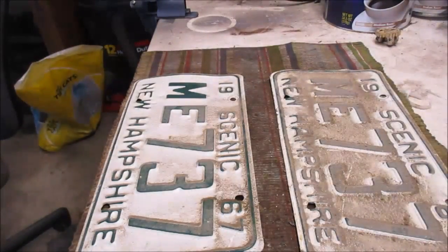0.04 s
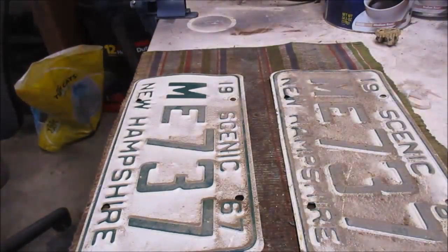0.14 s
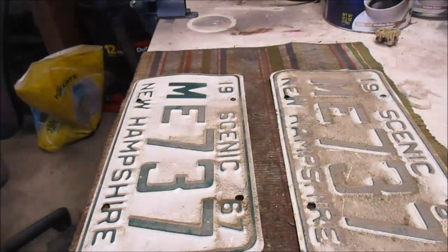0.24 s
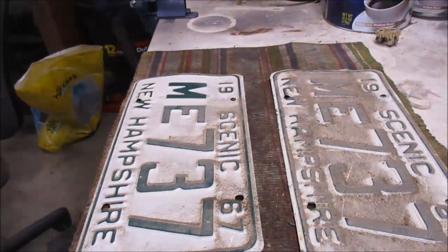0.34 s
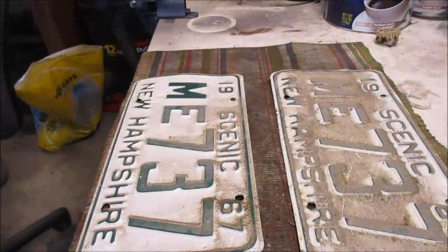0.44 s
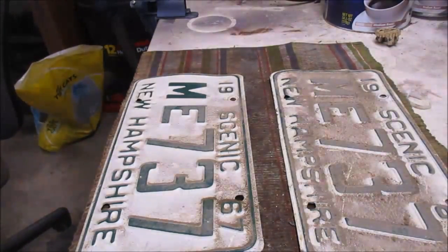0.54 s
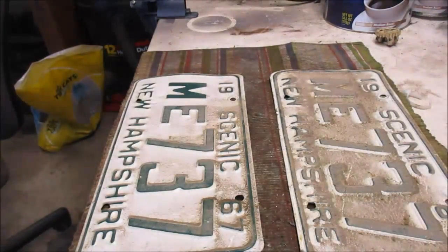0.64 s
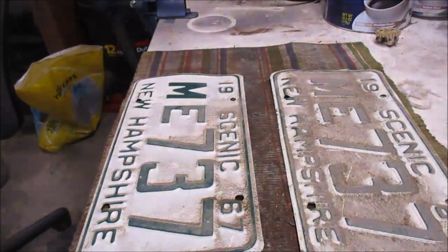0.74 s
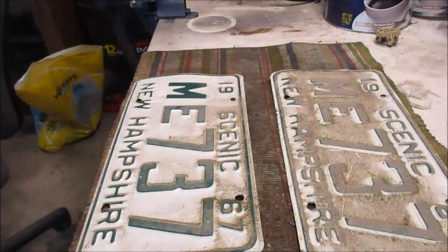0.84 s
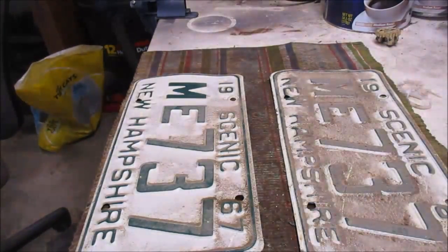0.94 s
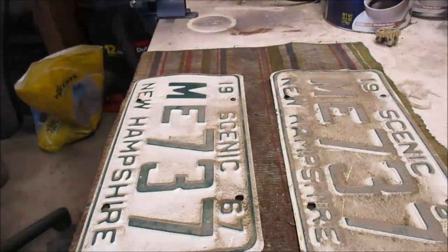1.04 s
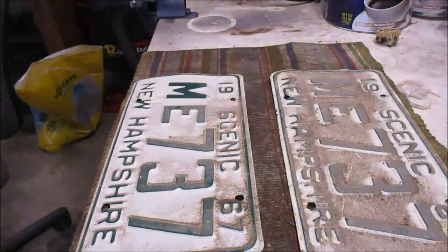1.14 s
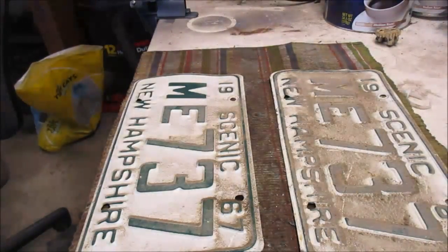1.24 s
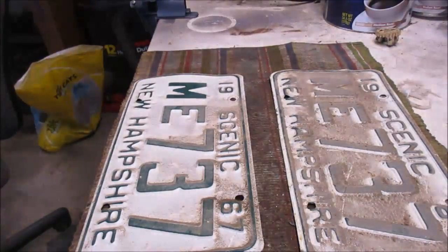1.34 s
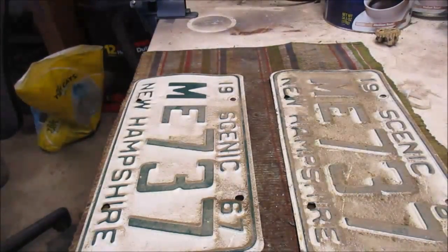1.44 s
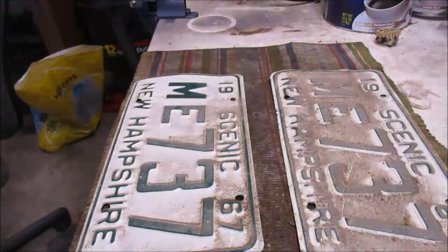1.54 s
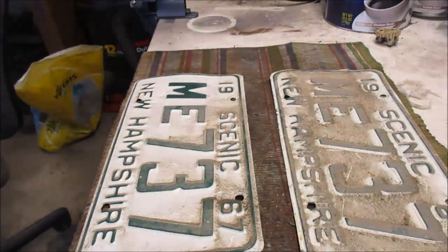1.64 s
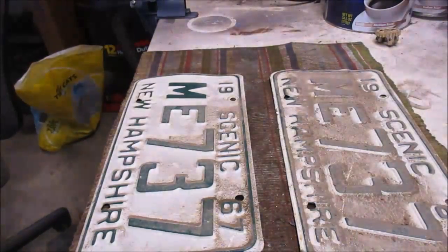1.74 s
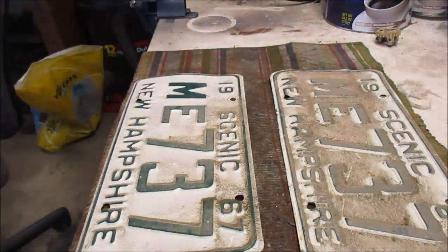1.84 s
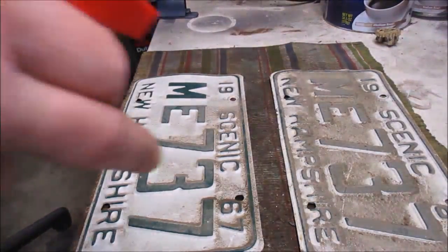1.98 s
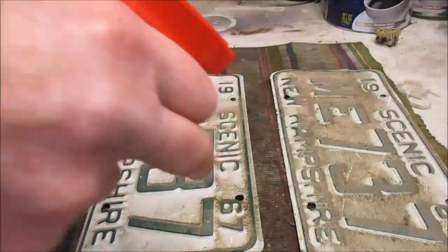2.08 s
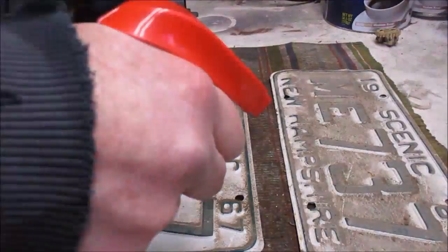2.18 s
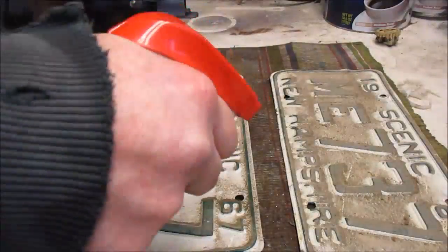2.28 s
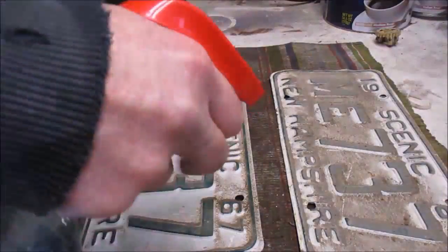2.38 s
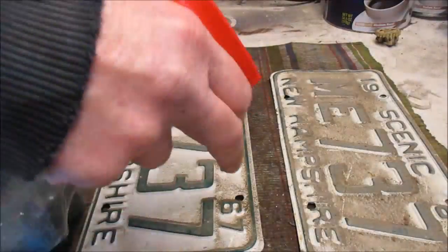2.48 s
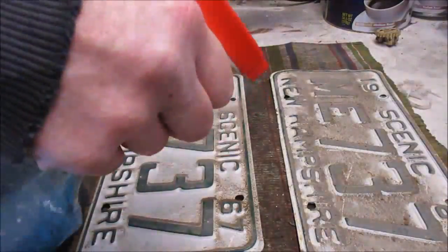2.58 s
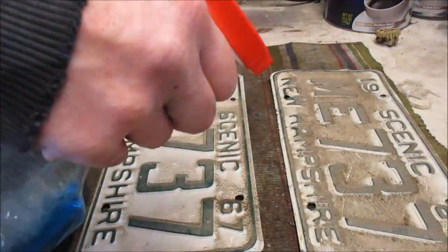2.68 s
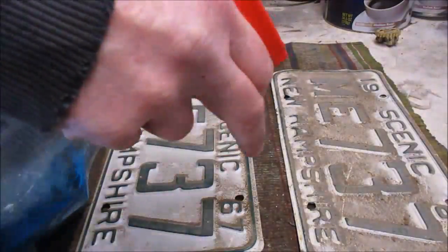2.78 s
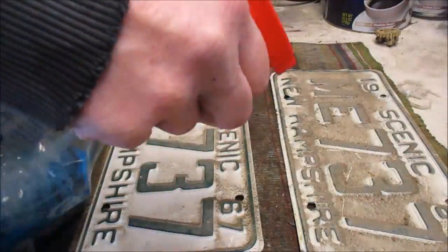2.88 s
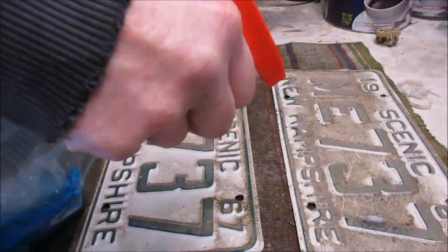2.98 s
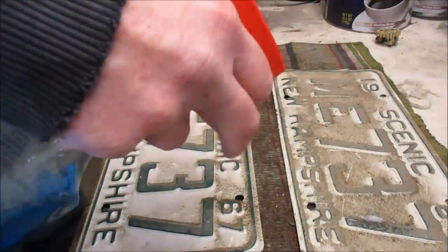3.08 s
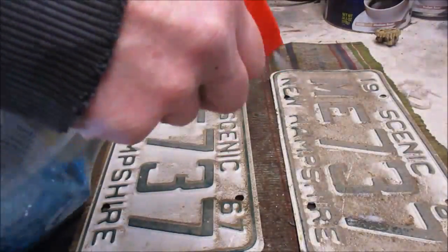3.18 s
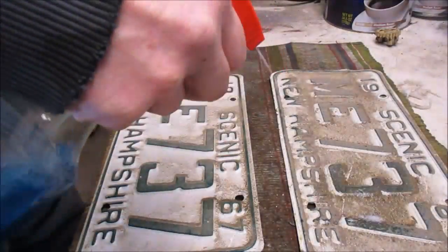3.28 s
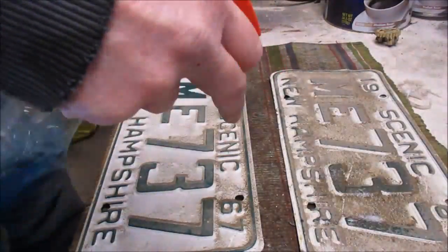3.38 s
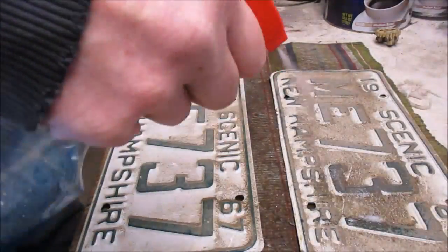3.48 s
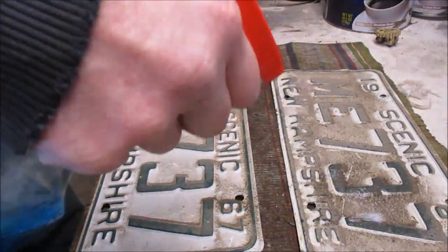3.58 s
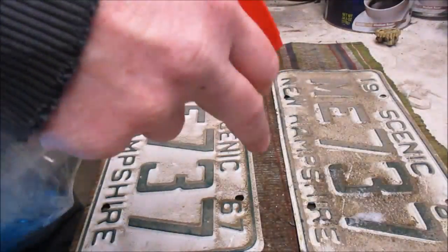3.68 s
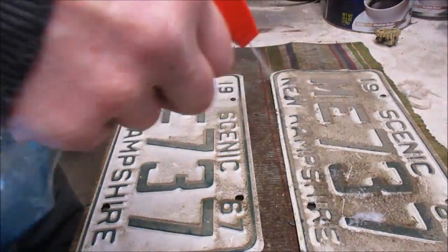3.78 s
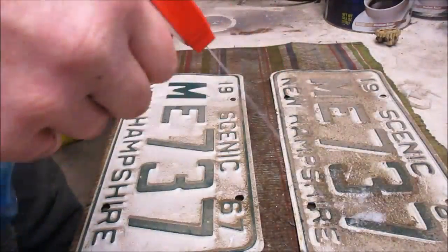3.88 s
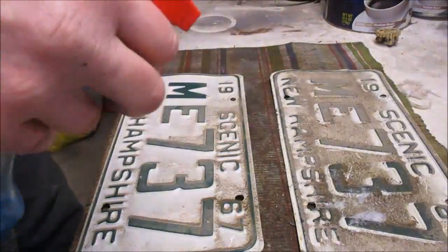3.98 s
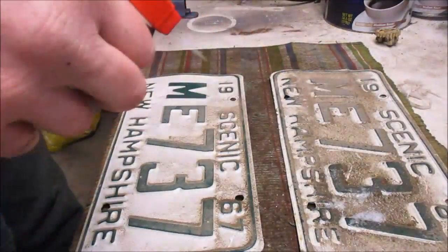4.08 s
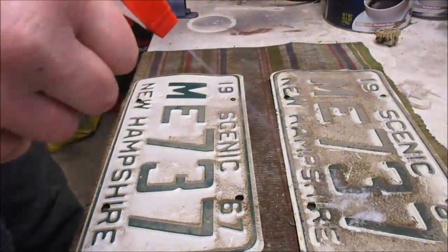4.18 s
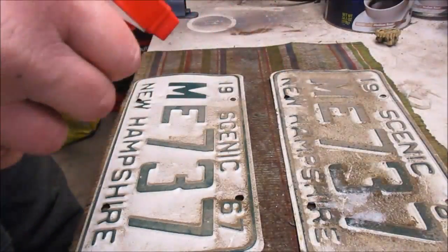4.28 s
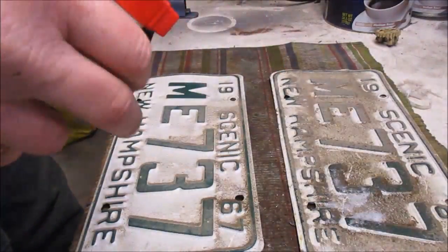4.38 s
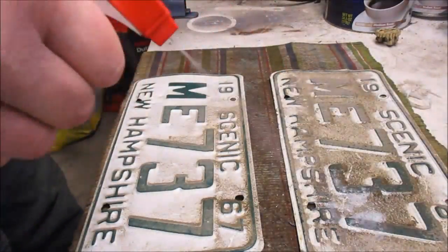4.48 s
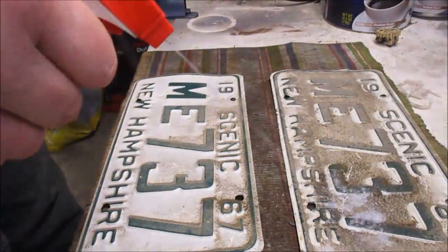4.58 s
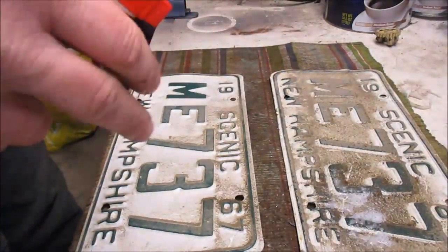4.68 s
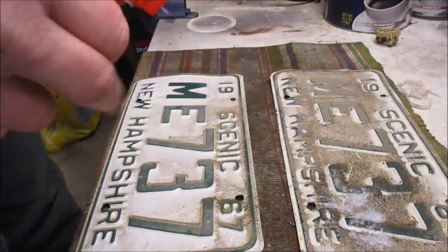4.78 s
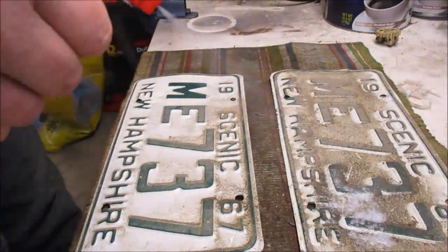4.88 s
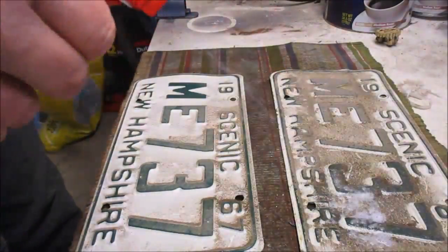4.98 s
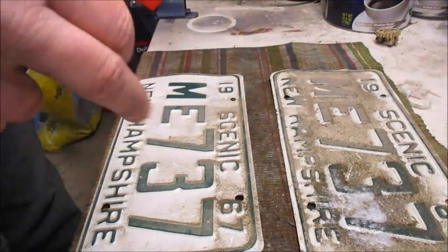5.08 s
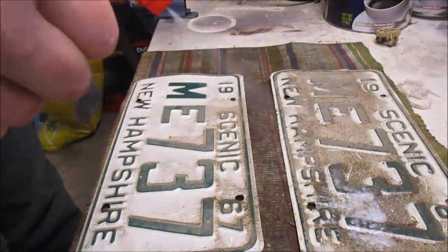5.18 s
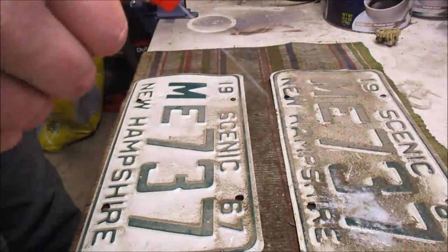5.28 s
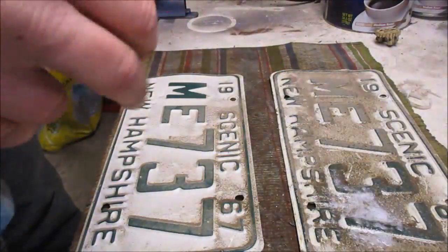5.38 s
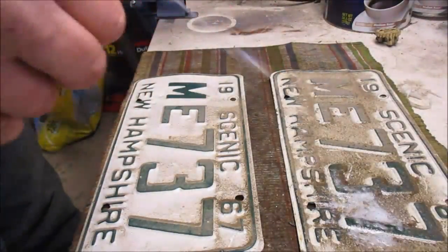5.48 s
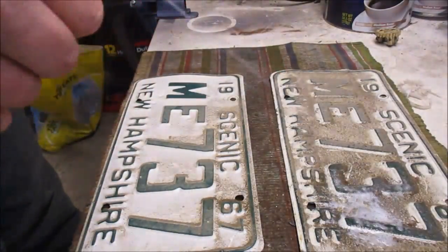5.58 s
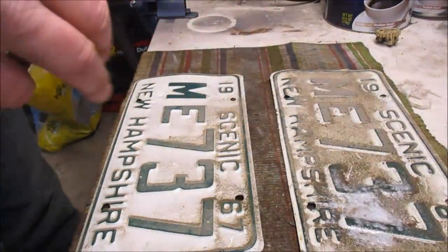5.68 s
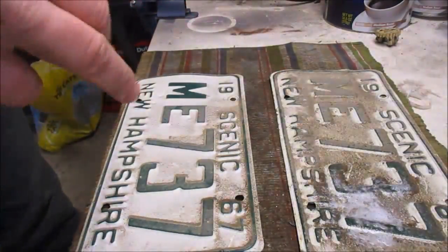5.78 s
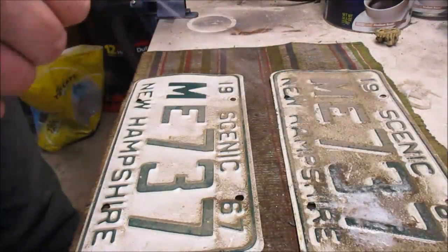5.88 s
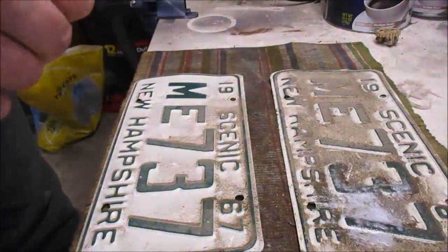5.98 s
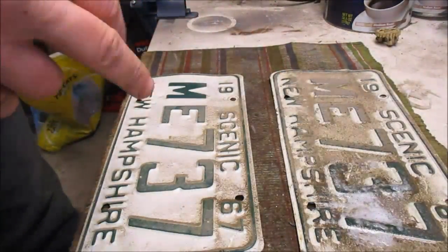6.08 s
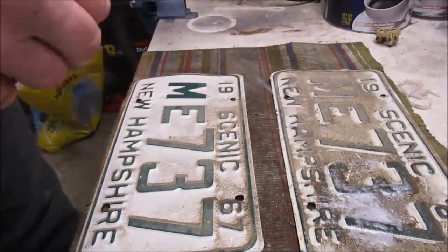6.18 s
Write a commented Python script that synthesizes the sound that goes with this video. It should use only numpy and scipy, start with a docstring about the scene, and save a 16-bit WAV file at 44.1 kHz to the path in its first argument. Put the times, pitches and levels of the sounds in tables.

```python
"""A plastic trigger bottle sprays cleaner on metal plates on a workbench, close by in a small workshop.
The spray is noise from the nozzle and random droplet impacts, reflected by the plate and bench.
The bottle is picked up with bumps and a rustling sleeve, and the pump primes with a few loud snaps; then come
about three spritzes a second. Between them the trigger clicks and creaks as filtered stick-slip impacts,
and the piston knocks the damped modes of the hollow bottle. Liquid stirs and a fan hums faintly."""
import sys
import numpy as np
from scipy import signal
from scipy.fft import rfft, irfft
from scipy.io import wavfile

SR = 44100
rng = np.random.default_rng(int(sys.argv[2]) if len(sys.argv) > 2 else 0)


def to_wav(sig):
    """Store sig (one row per channel, or 1-D mono) as 16-bit WAV at the path in sys.argv[1].

    Samples outside -1..1 are clipped; the rate is SR.
    """
    pcm = np.clip(np.atleast_2d(sig), -1, 1) * 32767
    pcm = np.round(pcm).astype(np.int16)
    wavfile.write(sys.argv[1], SR, pcm.T)  # frames by channels


N = 275013
TIME = np.arange(N) / SR
AFTER = TIME[:SR // 3]   # time since a blow [s]

# air noise of the room: level curve (time [s], level [dB]); spectrum (frequency [Hz], relative level [dB])
ROOM_LEVEL = [(0, -50.5), (2.5, -51.5), (2.65, -59.5), (2.8, -53.5), (3.03, -63), (3.3, -55.5), (4.7, -56),
              (5.1, -59), (6.24, -51)]
ROOM_SPECTRUM = [(12, -46), (20, -6), (74, 1), (146, -8), (198, -1.5), (270, -3.5), (301, -2.5),
                 (446, -3.5), (897, -4), (1000, -5.5), (1260, -11.5), (1400, -11), (1860, -16),
                 (16000, -44.5)]
# fan hum: (frequency [Hz], mean amplitude over the rms of the air noise [dB])
FAN_HUM = [(304, -9), (608, -8.5), (913, -9.5)]
# low rumble of the moving arm: (time [s], level [dB])
RUMBLE_LEVEL = [(2.0, -64), (2.2, -48), (2.47, -55.5), (2.65, -81), (3.4, -65), (5.3, -60)]
# liquid stirs in the bottle: (time [s], level [dB])
SLOSH_LEVEL = [(2.1, -61.5), (2.2, -51), (2.65, -60.5), (5.15, -57), (6.05, -47.5), (6.24, -57)]
# a sleeve brushes along as the arm reaches out:
# (time of maximum [s], relative level [dB], rise time [s], fall time [s])
SLEEVE_BRUSHES = [(0.01, -55.5, .05, 0.18), (.46, -50.5, .4, 0.31), (.89, -55, 0.074, 1),
                  (1.6, -50.5, 0.24, 0.25), (1.82, -59.5, 0.018, 0.31)]
BRUSH_DEPTH_DB = 25   # how far a brush rises and falls in those times
# rustle of the cloth: (frequency [Hz], relative level [dB])
CLOTH_SPECTRUM = [(710, -56), (1200, 3), (1370, -5.5), (2980, -10.5), (9410, -19), (14200, -29.5),
                  (16000, -42)]
# bumps as the bottle is fetched and handled:
# (time [s], peak level [dB], pitch [Hz], bandwidth [Hz], rattle t60 [s])
HANDLING_BUMPS = [(.281, -40.5, 170, 220, .15), (0.437, -33.5, 1260, 1100, .028),
                  (.44, -33, 1500, 1600, 0.37), (.869, -35, 168, 220, .033),
                  (1.457, -41.5, 5000, 1800, .03), (1.574, -27, 558, 89, 0.049),
                  (1.649, -36.5, 1400, 1200, 0.031), (1.809, -36, 1270, 1590, 0.063),
                  (2.1395, -16.5, 387, 259, 0.023), (2.212, -30.5, 447, 250, .21),
                  (2.222, -27.5, 770, 400, 0.2), (2.259, -36, 100, 90, 0.096),
                  (3.485, -36, 114.7, 74, 0.12)]

# the finger squeezes, the piston knocks and the jet follows:
# (time [s], relative knock level [dB], knock pitch [Hz], relative wall ring [dB], jet delay [s],
#  time to full pressure [s], time until release [s], mist level [dB], swell to full pressure [dB])
SQUEEZE_STROKES = [(2.139, -24, 240, -9, 0.042, .02, 0.024, -45, 5),
                   (2.545, -33, 340, -19, 0.032, .02, 0.025, -58.5, 2),
                   (2.87, -34, 330, -16, .026, 0.03, 0.1, -45, 9),
                   (3.158, -36.5, 333, -1, .037, 0.069, 0.13, -42, 2.5),
                   (3.478, -26.5, 300, -14, 0.024, .062, 0.12, -37, 20.5),
                   (3.792, -24, 323, -7, 0.028, 0.069, 0.12, -34, 15.5),
                   (4.115, -23.5, 321, -10, 0.032, 0.06, .11, -33, 6),
                   (4.464, -21, 300, -12, 0.029, 0.042, 0.12, -30.5, 11),
                   (4.815, -24.5, 328, -6.5, 0.027, 0.059, 0.16, -36, 2.5),
                   (5.161, -22.5, 324, -7, .04, 0.064, .1, -30, 21.5),
                   (5.496, -21, 315, -13, 0.035, 0.087, 0.12, -31.5, 7),
                   (5.845, -19, 321, -4.5, 0.029, 0.061, 0.12, -30.5, 1.5),
                   (6.188, -25.5, 293, -24, 0.018, 0.017, 0.07, -37.5, -1)]
# the valve shuts, then the trigger is let go and creaks back until the piston is home:
# (time let go [s], relative tick level [dB], creak over tick [dB], valve lead [s], relative valve knock [dB],
#  time home [s], relative home knock [dB], knock pitch [Hz], relative wall ring [dB], relative home tick [dB])
RETURN_STROKES = [(2.421, -31, -1, .033, -35, 2.493, -18, 381.6, -2, -38),
                  (2.7701, -38.5, -3, 0.032, -40, 2.82, -20.5, 300, -20, -27),
                  (3.0839, -33.5, -3, .034, -42, 3.117, -25.5, 360, 2, -39),
                  (3.3818, -27, -6.5, 0.02, -36.5, 3.399, -25.5, 294, 0.5, -42),
                  (3.688, -25.5, -5.5, .024, -35, 3.709, -24.5, 316, -1.5, -33),
                  (4.0218, -29, 0, 0.036, -38.5, 4.05, -24.5, 327, -0.5, -42),
                  (4.361, -23.5, -8.5, .036, -43, 4.398, -23, 340, -4, -26.5),
                  (4.702, -25.5, -2.5, 0.036, -42.5, 4.748, -19, 329, 1.5, -30),
                  (5.0476, -22.5, -7.5, .029, -38, 5.068, -25, 328, -3, -45),
                  (5.4033, -21, -8, .038, -42, 5.441, -21.5, 334, -5, -41),
                  (5.7351, -20, -9, 0.039, -36, 5.774, -16, 330, -4, -22.5),
                  (6.0875, -31, -1, .033, -26.5, 6.13, -16, 334, -4, -32)]
SLACK_S, SLACK_DB, SLACK_WALL_DB = 0.015, -15.5, -0.5   # a light touch takes up the slack before a squeeze
VALVE_HZ, VALVE_WALL_DB = 300, -17   # the valve's knock is low and soft
FREE_DB, FREE_WALL_DB = -12, -5   # coming free jolts the bottle: level against the tick, wall ring
# modes of the air and liquid in the bottle: (pitch ratio, relative level [dB], nominal t60 [s])
CAVITY_MODES = [(.71, -5, 0.029), (1.04, -1, 0.045), (1.4, -10, .03), (1.87, -21, 0.091)]
# modes of the bottle wall: (frequency [Hz], relative level [dB], nominal t60 [s])
WALL_MODES = [(1041, -3, 0.027), (1200, -2.5, 0.038), (1482, -8.5, 0.029), (2160, -9, 0.022),
              (3000, -15.5, 0.025)]

SQUEEZE_TICK_S, SQUEEZE_TICK_DB = .002, -15.5   # the trigger's tick: delay and level against the knock
STOP_CREAK_DB = -11.5   # creak after a tick at either stop
# air spits from the nozzle while the pump primes: (time [s], relative level [dB])
AIR_SPITS = [(2.882, -31.5), (2.8968, -29), (2.9182, -30)]
SPIT_FIZZ_DB = -16
# resonances of the trigger: (frequency [Hz], bandwidth [Hz], relative level [dB])
TRIGGER_RESONANCES = [(1160, 490, -2), (2260, 740, -4), (3150, 1030, -6.5), (5000, 930, -6.5),
                      (7340, 1140, -4), (8600, 390, -0.5), (9630, 780, -7.5), (12500, 3600, -18)]

# hiss and droplets of the spray: (frequency [Hz], relative level [dB])
MIST_SPECTRUM = [(290, -48), (500, -32), (631, -2), (773, -21), (1180, -2.5), (1640, -7), (2430, -7.5),
                 (3700, -4), (4150, -2), (4660, -3), (6420, -0.5), (8830, 1.5), (10200, -5), (13400, -1.5),
                 (16000, -8)]
# the jet opens, sags past full pressure, then dies
JET_ATTACK_S, JET_SAG_DB_PER_S, JET_RELEASE_DB_PER_S = .012, 133, 303

# the piston snaps against its stop:
# (time [s], relative level [dB], crack pitch [Hz], relative spring ring [dB], relative clack [dB])
STOP_SNAPS = [(2.4960, -14.5, 1700, 5, 10), (2.4969, -18, 6000, 3, 9), (2.82, -25, 4530, -14, 8.5),
              (2.8222, -12, 5000, -4, 2.5), (3.1156, -22.5, 3400, -8, 0), (3.1221, -22.5, 1600, -13, -3.5),
              (4.7486, -12, 3000, -37, -12), (6.1291, -16, 3000, -14, -19), (6.1404, -11, 3600, -25, -30)]
# resonances of the spray head: (frequency [Hz], bandwidth [Hz], relative level [dB])
HEAD_RESONANCES = [(1200, 330, 3.5), (2150, 860, -0.5), (2890, 1100, -1), (4270, 320, -2.5),
                   (5670, 990, -4.5), (8750, 1300, -2.5), (11600, 2700, -9)]
# modes of the return spring: (frequency [Hz], relative level [dB], nominal t60 [s])
SPRING_MODES = [(3990, -34, 0.02), (5080, 11, 0.013), (5560, -7, 0.04), (5800, 6.5, 0.014),
                (6000, -1.5, 0.058), (6300, 14.5, 0.012), (7000, -13, 0.047), (10980, -0.5, 0.019)]
# modes of the neck and cap: (frequency [Hz], relative level [dB], nominal t60 [s])
NECK_MODES = [(484, 0, 0.024), (604, -3, 0.031), (1200, -0.5, 0.019), (1440, 1.5, 0.0075),
              (1890, -1.5, 0.0067)]

# reflections from bench and walls, before they are dulled: (delay [s], level [dB])
NEAR_ECHOES = [(.0031, -26.5), (.0087, -27), (0.0142, -21.5)]
CUTOFF_HZ = 15900


def from_db(db):
    """Level to amplitude ratio: 20 dB is a factor of ten."""
    return 10 ** (np.asarray(db) / 20)


def rms_one(x):
    """Normalise the mean power to one."""
    return x / np.sqrt(np.mean(x ** 2) + 1e-20)


def level(rows):
    """Interpolate a level curve in dB and give the gain at every sample."""
    s, db = np.transpose(rows)
    return from_db(np.interp(TIME, s, db))


def add(out, s, sound):
    """Superpose a sound at a given time."""
    at = round(s * SR)
    out[at:at + len(sound)] += sound[:N - at]


def dying(t60):
    """Exponential decay: the amplitude falls by 60 dB in t60 seconds."""
    return np.exp(-np.log(1000) * AFTER / t60)


def drift(rate):
    """Slow random fluctuation of rms 1, with this many random points a second."""
    knots = rng.standard_normal(N // 20)
    return rms_one(np.interp(TIME * rate, np.arange(len(knots)), knots))


def coloured(x, spectrum):
    """Spectral shaping: weight the frequencies of a steady noise; rms 1."""
    hz, db = np.transpose(spectrum)
    bins = np.maximum(np.fft.rfftfreq(N, 1 / SR), 1)
    gain = from_db(np.interp(np.log(bins), np.log(hz), db))
    return rms_one(irfft(rfft(x) * gain, N))


def resonate(x, resonances):
    """Parallel two-pole resonances of alternating sign, whose bandwidth sets the damping."""
    out = 0
    for k, (hz, width, db) in enumerate(resonances):
        r = np.exp(-np.pi * width / SR)
        poles = [1, -2 * r * np.cos(2 * np.pi * hz / SR), r * r]
        band = signal.lfilter([1, 0, -1], poles, x + 1e-18)
        out = out + (-1) ** k * from_db(db) * (1 - r * r) / 2 * band
    return out


def ring(modes, spread_db, pitch=1):
    """Modal sum of damped sines; the grip changes their strength and damping at every blow."""
    out = 0
    for k, (hz, db, t60) in enumerate(modes):
        strength = (-1) ** k * from_db(db + spread_db * rng.standard_normal())
        decay = dying(t60 * from_db(rng.standard_normal()))
        out = out + strength * decay * np.sin(2 * np.pi * hz * pitch * AFTER)
    return out


def burst(t60):
    """Transient noise under exponential decay, with unit energy."""
    crack = rng.standard_normal(len(AFTER)) * dying(t60)
    return crack / np.linalg.norm(crack)


def contact(t60, rattle_db):
    """Impulsive excitation: one clean impact and the rattle that follows it."""
    return (AFTER == 0) + from_db(rattle_db) * burst(t60)


def grains(per_s, spread_db, size):
    """Shot noise: tiny impacts at random moments, of uneven strength; rms 1."""
    strength = from_db(spread_db * np.minimum(rng.exponential(1, size), 4))
    struck = rng.random(size) < per_s / SR
    return rms_one(struck * strength * rng.choice([-1, 1], size))


def room_tone():
    """Broadband air noise with the tones of a fan, which waver in amplitude and in a shared phase."""
    turns = TIME + np.cumsum(.002 * drift(4)) / SR
    hum = 0
    for hz, db in FAN_HUM:
        hum = hum + from_db(db + 2 * drift(4)) * np.sin(2 * np.pi * hz * turns)
    return level(ROOM_LEVEL) * (coloured(rng.standard_normal(N), ROOM_SPECTRUM) + hum)


def rumble():
    """Low-frequency noise: the arm stirs the air and the bench close by."""
    spectrum = [(20, -4.5), (45, -11.0), (70, 4), (130, -7.5), (400, -39)]   # (frequency [Hz], level [dB])
    return level(RUMBLE_LEVEL) * coloured(rng.standard_normal(N), spectrum)


def slosh():
    """Resonant transmission: small bubbles and splashes, heard through the bottle."""
    splashes = grains(per_s=900, spread_db=3.5, size=N)
    # (frequency [Hz], bandwidth [Hz], level [dB])
    through = resonate(splashes, [(316, 177, 3.5), (1200, 235, 1.5), (1840, 580, -4.0), (7400, 6000, -19.5)])
    return level(SLOSH_LEVEL) * rms_one(through)


def handling(sleeve_db=-1):
    """Friction and impact: a sleeve's rustle swells and fades with each reach; bumps excite broad resonances."""
    brushing = 0
    for s, db, rise_s, fall_s in SLEEVE_BRUSHES:
        distance = np.maximum((s - TIME) / rise_s, (TIME - s) / fall_s)
        brushing = brushing + from_db(db - BRUSH_DEPTH_DB * distance)
    rustle = coloured(grains(per_s=9000, spread_db=2.5, size=N), CLOTH_SPECTRUM)
    out = from_db(sleeve_db) * brushing * rustle
    for s, db, hz, width, t60 in HANDLING_BUMPS:
        struck = resonate(contact(t60, rattle_db=9), [(hz, width, 0)])
        bump = resonate(struck, [(hz, 2 * hz, 0)])
        add(out, s, from_db(db) * bump / np.abs(bump).max())
    return out


def piston_blows():
    """Impact times: squeeze, valve, release, home and slack, as (time [s], level [dB], pitch [Hz], wall [dB])."""
    blows = [(s, db, hz, wall_db) for s, db, hz, wall_db, *_ in SQUEEZE_STROKES]
    for s, tick_db, _, lead_s, valve_db, home_s, db, hz, wall_db, _ in RETURN_STROKES:
        blows.append((s - lead_s, valve_db, VALVE_HZ, VALVE_WALL_DB))
        blows.append((s, tick_db + FREE_DB, hz, FREE_WALL_DB))
        blows.append((home_s, db, hz, wall_db))
    # the trigger has slack only once it has sprung back
    for s, db, hz, *_ in SQUEEZE_STROKES[1:]:
        blows.append((s - SLACK_S, db + SLACK_DB, hz, SLACK_WALL_DB))
    return blows


def knocks(cavity_db=5, wall_db=-5, rattle_db=8, flex_s=0.00123, low_hz=140):
    """Modal excitation: blows thump the bottle and ring its thin wall; loose parts rattle after them."""
    out = np.zeros(N)
    for s, db, hz, hard_db in piston_blows():
        boom = from_db(cavity_db) * ring(CAVITY_MODES, spread_db=1.0, pitch=hz)
        wall = from_db(wall_db + hard_db) * ring(WALL_MODES, spread_db=2.0)
        loose_parts = [(320, 450, 0), (1250, 380, hard_db), (2500, 1600, hard_db + 0.5)]
        rattle = from_db(rattle_db) * resonate(burst(t60=.08), loose_parts)
        add(out, s + flex_s, from_db(db) * (boom + wall + rattle))   # the wall flexes a moment before it sounds
    # a small bottle radiates little bass
    return signal.sosfilt(signal.butter(2, low_hz, "high", fs=SR, output="sos"), out + 1e-18)


def trigger_ticks():
    """Tick times: squeeze, release, home and spitting air, as (time [s], level [dB], creak [dB])."""
    ticks = [(s + SQUEEZE_TICK_S, db + SQUEEZE_TICK_DB, STOP_CREAK_DB) for s, db, *_ in SQUEEZE_STROKES]
    for s, db, creak_db, _, _, home_s, *_, home_db in RETURN_STROKES:
        ticks += [(s, db, creak_db), (home_s, home_db, STOP_CREAK_DB)]
    return ticks + [(s, db, SPIT_FIZZ_DB) for s, db in AIR_SPITS]


def clicks(click_db=19, creak_db=13, creak_t60=0.16, slip_db=-5):
    """Stick-slip friction: a tick, a second slip 7 to 11 ms later and a dying creak excite the trigger."""
    out = np.zeros(N)
    for s, db, drag_db in trigger_ticks():
        slips = grains(per_s=1500, spread_db=3, size=len(AFTER)) * dying(creak_t60)
        slips = signal.fftconvolve(slips, burst(t60=0.0075))[:len(AFTER)]
        creak = from_db(creak_db + drag_db) * slips / np.linalg.norm(slips)
        tick = contact(t60=.014, rattle_db=5)
        add(out, s, from_db(db) * (tick + creak))
        second_slip = from_db(db + slip_db) * burst(t60=.012)
        add(out, s + rng.uniform(.007, .011), second_slip)
    return from_db(click_db) * resonate(out, TRIGGER_RESONANCES)


def jet_level(rise_s, length_s, swell_db):
    """Pressure envelope: the jet opens, swells to full pressure, sags, and dies once the piston stops."""
    swell = -swell_db * np.maximum(1 - AFTER / rise_s, 0)
    sag = -JET_SAG_DB_PER_S * np.maximum(AFTER - rise_s, 0)
    release = -JET_RELEASE_DB_PER_S * np.maximum(AFTER - length_s, 0)
    return np.minimum(AFTER / JET_ATTACK_S, 1) * from_db(swell + sag + release)


def mist(droplets_db=-13, flutter_db=1.85, mirror_db=-9, scatter_db=-5):
    """Turbulent noise and shot noise: the nozzle hisses, droplets patter on the metal, surfaces reflect both."""
    droplets = grains(per_s=6000, spread_db=3.5, size=N)
    spray = coloured(rng.standard_normal(N) + from_db(droplets_db) * droplets, MIST_SPECTRUM)
    hiss = spray * from_db(flutter_db * drift(140))
    out = np.zeros(N)
    for s, *_, delay_s, rise_s, length_s, db, swell_db in SQUEEZE_STROKES:
        # the plate mirrors the hiss and tins on the bench scatter it, differently as the hand moves on
        paths = contact(t60=.06, rattle_db=scatter_db)
        paths[round(rng.uniform(.0005, .0011) * SR)] += from_db(mirror_db)
        stretch = np.roll(hiss, -round(s * SR))[:len(AFTER)]
        jet = from_db(db) * jet_level(rise_s, length_s, swell_db) * stretch
        add(out, s + delay_s, signal.fftconvolve(jet, paths / np.linalg.norm(paths)))
    return out


def snaps(crack_db=15.0, rattle_db=-8, spring_db=-14, clack_db=-8, edge_db=-6, low_hz=200):
    """Hard impact: a stop cracks through the spray head, clacks in the neck and rings the return spring."""
    out = np.zeros(N)
    for s, db, crack_hz, ring_db, neck_db in STOP_SNAPS:
        blow = contact(t60=.004, rattle_db=0) + from_db(rattle_db) * burst(t60=0.041)
        # the hardness of the contact sets where the crack is strongest
        hardened = from_db(edge_db) * blow + resonate(blow, [(crack_hz, crack_hz, 0)])
        crack = resonate(hardened, HEAD_RESONANCES)
        crack = from_db(crack_db) * crack / np.linalg.norm(crack)
        spring = from_db(spring_db + ring_db) * ring(SPRING_MODES, spread_db=0.5)
        clack = from_db(clack_db + neck_db) * ring(NECK_MODES, spread_db=2)
        add(out, s, from_db(db) * (crack + spring + clack))
    return signal.sosfilt(signal.butter(2, low_hz, "high", fs=SR, output="sos"), out + 1e-18)


def workshop(x, tail_db=-15, t60=0.18, dull_hz=5000):
    """Room response by convolution: near reflections and a short tail, both duller than the direct sound."""
    tail = np.concatenate([np.zeros(SR // 100), burst(t60)])   # starts after 10 ms
    response = from_db(tail_db) * tail
    for delay, db in NEAR_ECHOES:
        response[round(delay * SR)] += from_db(db)
    soft = np.exp(-2 * np.pi * dull_hz / SR)
    dulled = signal.lfilter([1 - soft], [1, -soft], response)
    return x + signal.fftconvolve(x, dulled)[:N]


def scene():
    """Superposition: the bottle and its handling in the room, over the rumble and the room tone."""
    background = room_tone() + rumble()
    bottle = slosh() + handling() + knocks() + clicks() + mist() + snaps()
    return (workshop(bottle) + background)[None]


def record(dry):
    """Saturation and low-pass filtering: peaks are rounded and the top is cut."""
    rounded = np.tanh(dry)
    return signal.sosfilt(signal.ellip(10, .1, 80, CUTOFF_HZ, fs=SR, output="sos"), rounded)


dry = scene()
out = record(dry)
to_wav(out)
```